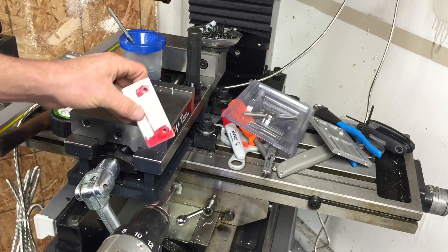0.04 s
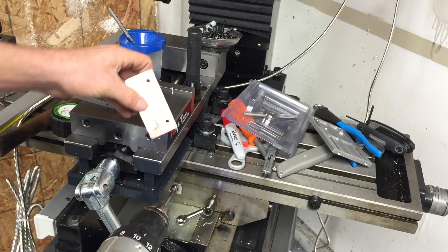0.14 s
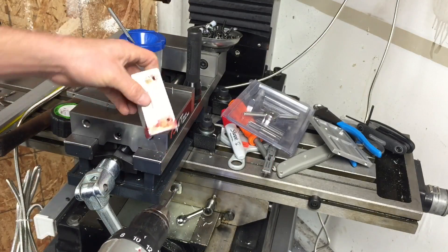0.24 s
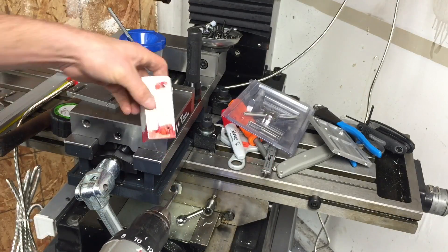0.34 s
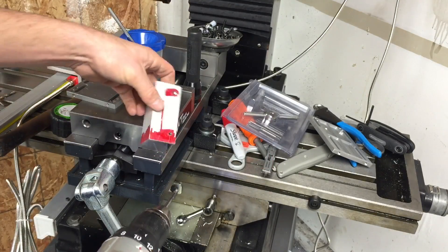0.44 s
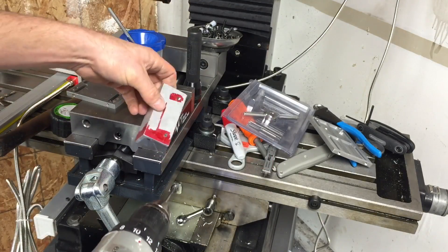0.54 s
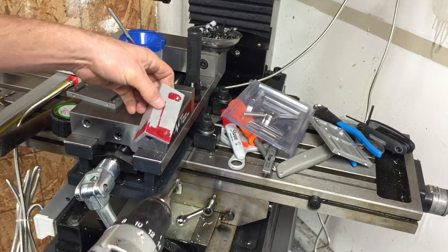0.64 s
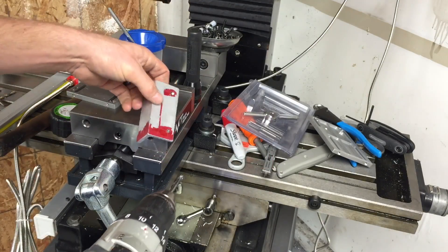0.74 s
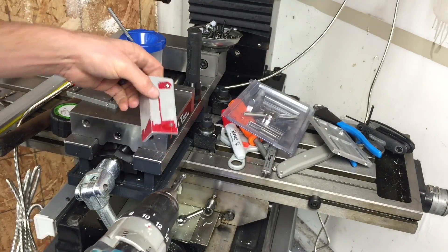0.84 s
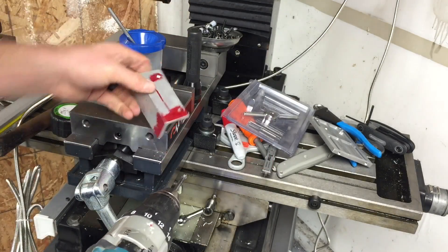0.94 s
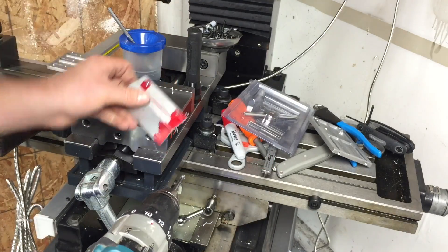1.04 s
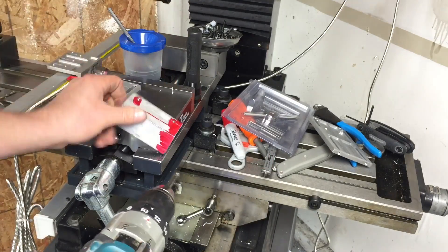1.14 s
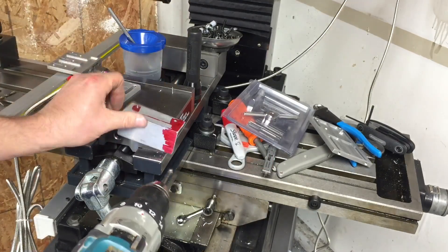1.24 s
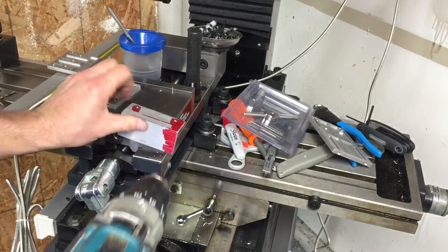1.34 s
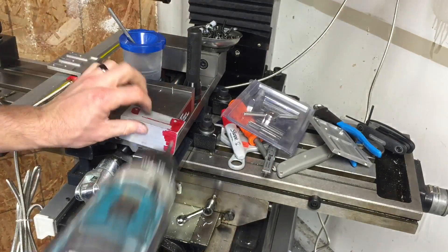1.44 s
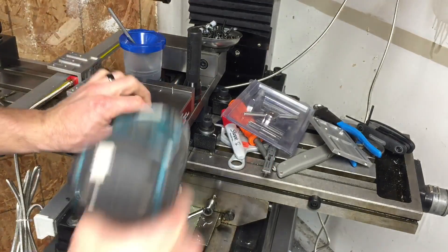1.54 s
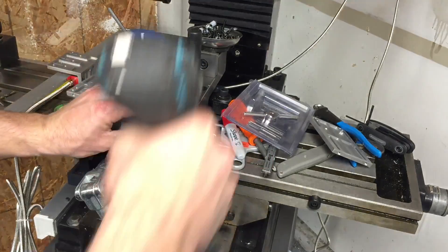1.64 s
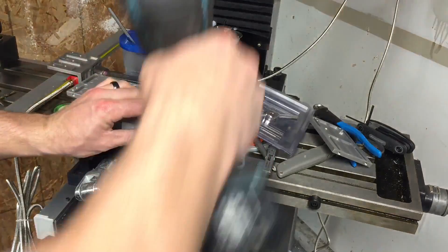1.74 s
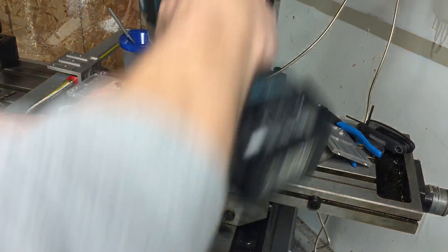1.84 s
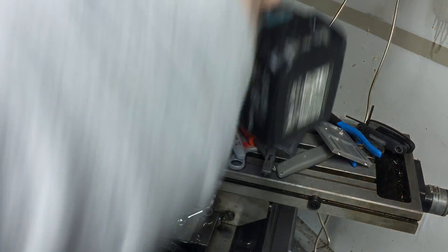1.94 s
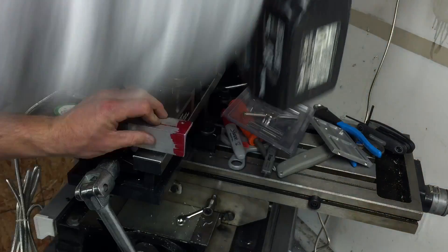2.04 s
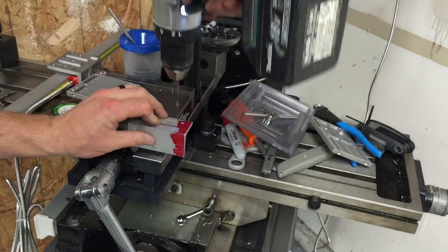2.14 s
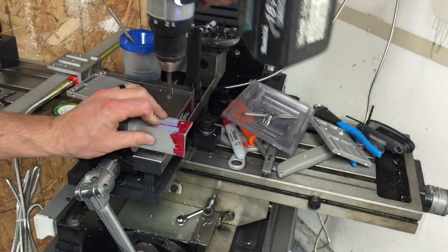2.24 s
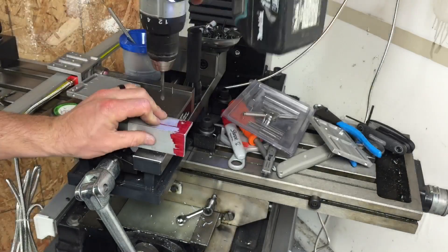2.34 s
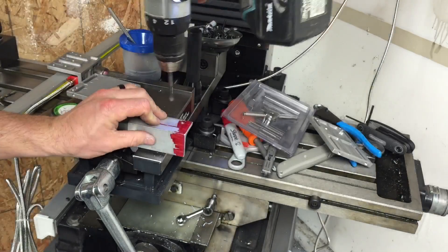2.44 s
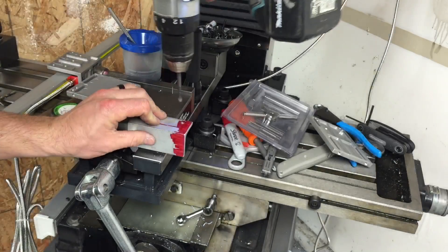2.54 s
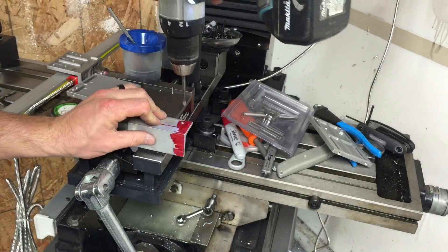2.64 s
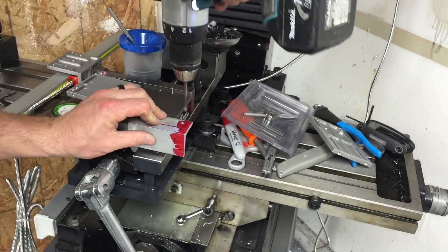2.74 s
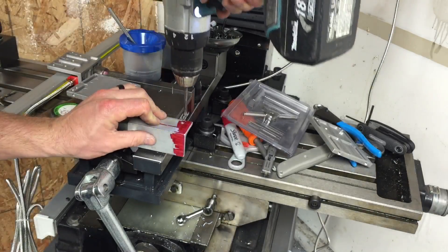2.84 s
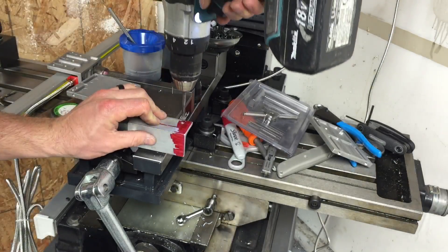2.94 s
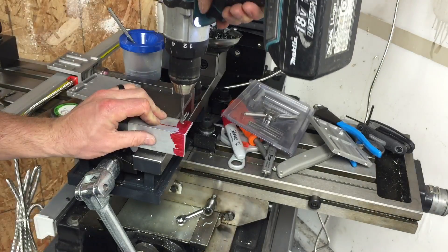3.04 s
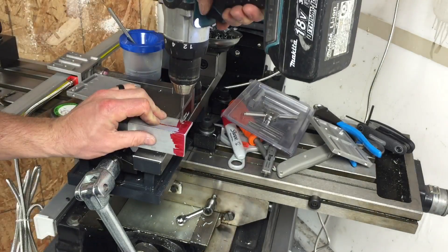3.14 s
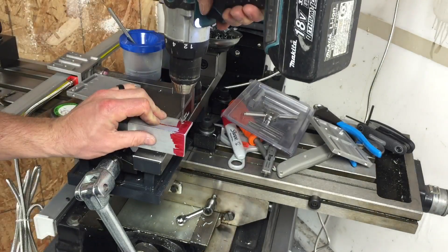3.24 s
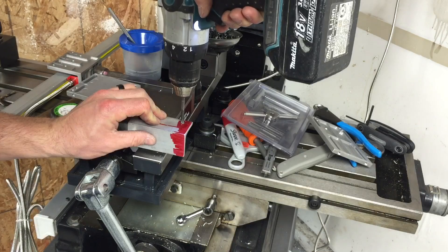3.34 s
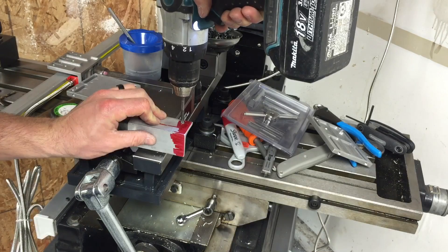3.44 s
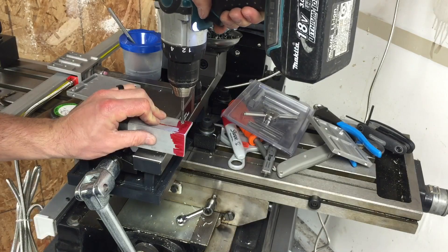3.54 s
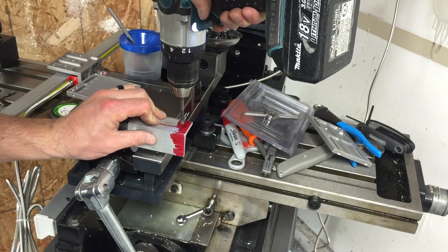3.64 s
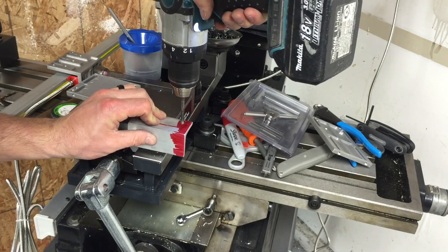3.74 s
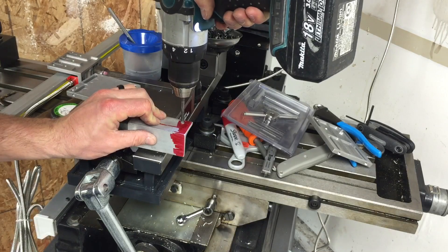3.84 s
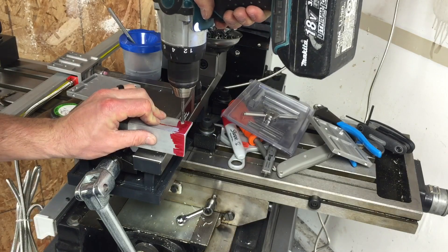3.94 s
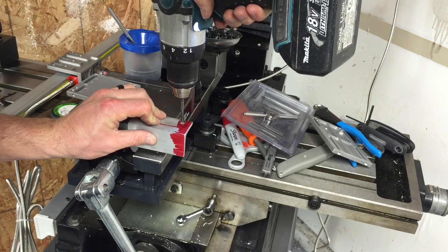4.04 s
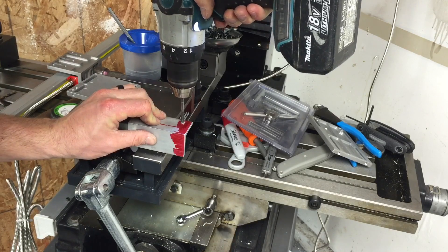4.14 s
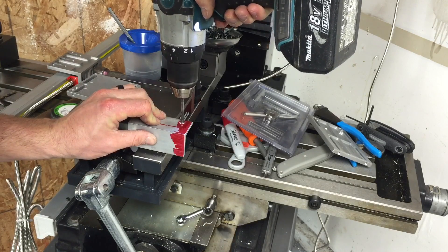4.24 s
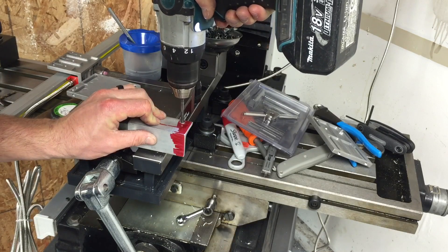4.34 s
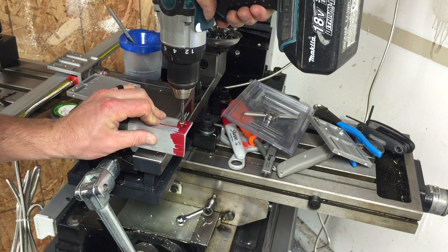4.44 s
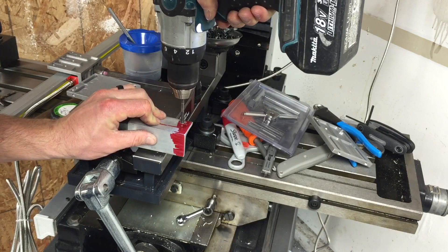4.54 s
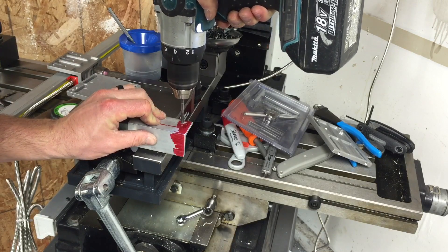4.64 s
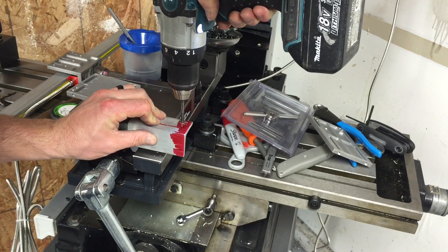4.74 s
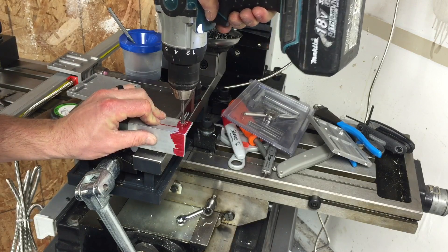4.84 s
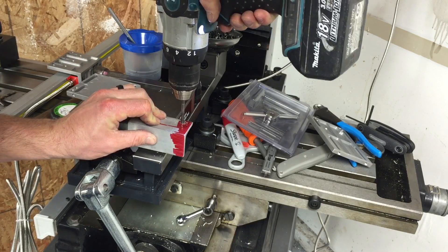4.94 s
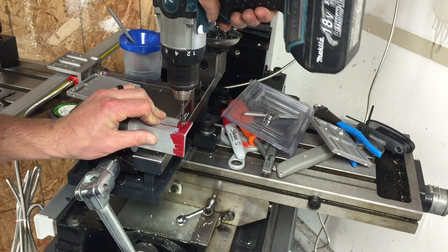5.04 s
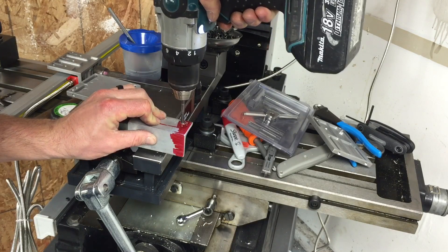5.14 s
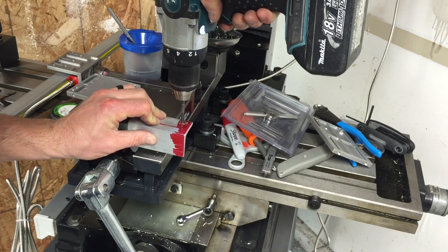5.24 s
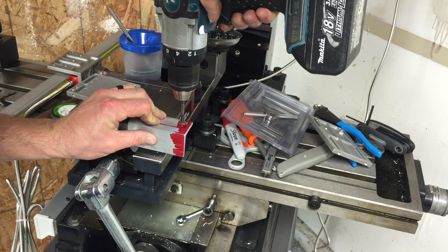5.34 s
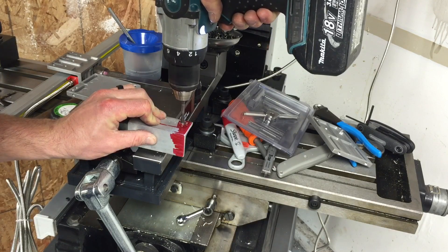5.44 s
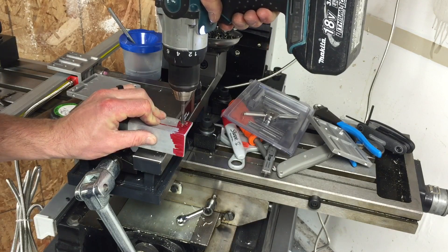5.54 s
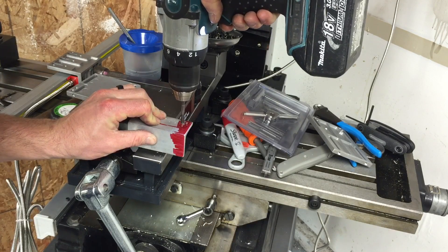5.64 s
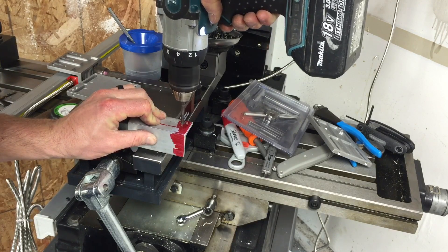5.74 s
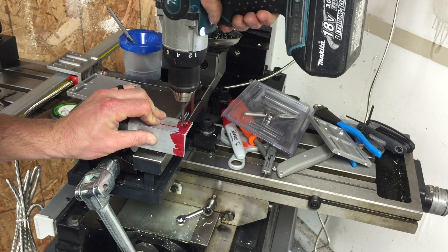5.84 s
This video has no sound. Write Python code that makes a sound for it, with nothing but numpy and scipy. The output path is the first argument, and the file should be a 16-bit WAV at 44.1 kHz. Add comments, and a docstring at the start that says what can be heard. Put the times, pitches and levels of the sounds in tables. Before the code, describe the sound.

Light metal clinks on a solid vice come first, followed by dry clacks as a cordless drill is lifted. Faint bit taps break a near-silent gap. Then two roughly one-second drilling bursts, split by a tiny pause, grind with motor buzz, gear whine, rattle and scraping hiss, each speeding up towards its end. Close microphone, identical in both channels, small hard room, faint machine hum.

```python
"""A small workshop with a faint machine hum: a metal angle bracket is turned over and set down on a steel vice.
Its clinks are ringing tones plus a dead clack from the vice; a cordless drill is picked up with short knocks.
The bit is placed, then bores in two slow bursts on a half-pulled trigger: current pulses make the speed control
buzz, tones tied to the motor's turning make the gears whine, and shaped noise makes the rattle and scrape.
Bench bumps, still air and reflections from close walls surround it."""
import sys
import numpy as np
from scipy import signal
from scipy.fft import rfft, irfft
from scipy.io import wavfile
from scipy.ndimage import uniform_filter1d

SR = 44100
rng = np.random.default_rng(int(sys.argv[2]) if len(sys.argv) > 2 else 0)


def put_to_file(sound):
    """Save the sound as 16-bit audio at rate SR, in the file named by the first command-line argument."""
    columns = np.atleast_2d(sound).T  # one column per channel
    safe = np.clip(columns, -1, 1)
    whole_steps = np.round(safe * 32767)
    wavfile.write(sys.argv[1], SR, whole_steps.astype(np.int16))


N = 260345
T = np.arange(N) / SR  # time of every sample [s]
LABOURING, RACING = 44.6, 69.1  # shaft speed under full load and running nearly free [turns per s]


def amp(db):
    """Turns decibels into a gain."""
    return 10 ** (np.asarray(db) / 20)


def unit(x):
    """Scales a signal to an rms of 1."""
    return x / np.sqrt(np.mean(x ** 2) + 1e-20)


def curve(tables):
    """Joins the points of all bursts by straight lines in time."""
    return np.interp(T, *np.concatenate(tables).T)


def read(points, hz):
    """Reads a table of values over frequency, with pitch spaced logarithmically."""
    f, value = np.transpose(points)
    return np.interp(np.log(hz + 1), np.log(f + 1), value)


def add(mix, s, sound):
    """Mixes a sound in at time s, cutting it at the end of the mix."""
    part = mix[round(s * SR):][:len(sound)]
    part += sound[:len(part)]


def wander(hz):
    """Drifts at random with an rms of 1, up to about hz: random points joined by lines."""
    place = T * 2.5 * hz
    count = int(place[-1]) + 2
    return unit(np.interp(place, np.arange(count), rng.standard_normal(count)))


def body(spectrum, tilt_db=0, size=4096):
    """Gives an object's answer to a tap, energy 1, with its sound packed as early as the spectrum allows."""
    hz = np.fft.rfftfreq(size, 1 / SR)
    level_db = read(spectrum, hz) + tilt_db * np.log2(1 + hz / 1000)
    cepstrum = irfft(np.log(amp(level_db)))
    # folding the second half onto the first makes the answer begin at the tap (minimum phase)
    cepstrum[1:size // 2] *= 2
    cepstrum[size // 2 + 1:] = 0
    response = irfft(np.exp(rfft(cepstrum)))
    return response / np.linalg.norm(response)


def through(x, spectrum):
    """Lets an object colour the sound x that passes through it."""
    return signal.oaconvolve(x, body(spectrum))[:N]


def contact(length, size=6000):
    """Two hard faces meet: tiny collisions swell at once, then fade with the contact length as time constant."""
    u = np.arange(size) / SR / max(length, 1e-4)
    return rng.standard_normal(size) * np.exp(-u) * (1 - np.exp(-(4 * u) ** 2))


# Bursts of drilling: (trigger pulled [s], released [s], time until the bit bites [s],
# gear rattle before later changes [dB], gear whine before later changes [dB])
BURSTS = [(3.756, 4.852, .05, -28.5, -5.5), (4.9944, 5.95, .1, -29.6, -8.5)]


def bursts():
    """Gives the columns of the latest burst begun at each moment (the first burst before it starts)."""
    rows = np.array(BURSTS)
    latest = np.maximum(np.searchsorted(rows[:, 0], T) - 1, 0)
    return rows[latest].T


def running(coast_s):
    """Is 1 while the trigger is pulled, then dies away with the given time constant."""
    on, off, *_ = bursts()
    return (T >= on) * np.exp(-np.maximum(T - off, 0) / coast_s)


# Motor shaft in each burst; it spins up, sags under the load, then races:
# (time [s], speed before smoothing [turns per s])
SHAFT = [
    [(3.757, 10.4), (3.855, 55.3), (3.925, 58.7), (4.07, 45.7), (4.185, 40.7), (4.375, 37.9), (4.48, 65.0),
     (4.57, 71.4), (4.635, 65.3), (4.72, 67.7), (4.82, 64.0), (4.88, 15.6)],
    [(4.995, 8.1), (5.065, 36.5), (5.205, 44.5), (5.465, 39.8), (5.655, 37.1), (5.725, 62.7), (5.82, 64.3),
     (5.9, 74.2)],
]


def drill(inertia_s=.025, whine_racing_db=5.5):
    """Adds buzz, whine, rattle and scrape, which follow the shaft speed and the bite of the bit."""
    # the rotor's mass rounds off changes of speed
    speed = uniform_filter1d(curve(SHAFT), round(inertia_s * SR))
    turns = np.cumsum(speed * (1 + 0.0015 * wander(20))) / SR
    fast = np.clip((speed - LABOURING) / (RACING - LABOURING), 0, 1)  # 0 labouring, 1 racing
    on, _, bite_s, rattle_level, whine_level = bursts()
    skid = 1 - np.clip((T - on) / bite_s, 0, 1) ** 2  # 1 as the bit first skids, 0 once it has bitten
    buzz, phase = chopper(fast)
    # the gears sing out as the motor races
    whine = gears(turns, speed, whine_level + whine_racing_db * fast ** 2)
    scrape = gear_rattle(turns, phase, fast, skid, rattle_level) + cutting(phase, fast, skid)
    return buzz + whine + scrape * running(0.01)


# Buzz of the speed control in each burst: (time [s], rate of current pulses [pulses per s])
PULSE_RATE = [
    [(3.757, 201.6), (3.815, 254.0), (3.89, 202.9), (4.13, 241.0), (4.345, 254.5), (4.405, 264.6),
     (4.535, 237.0), (4.85, 250.9)],
    [(4.995, 193.9), (5.06, 276.2), (5.205, 262.6), (5.635, 246.0), (5.9, 205.6)],
]
# How the housing answers a kick: (frequency [Hz], relative level [dB])
HOUSING = [(100, -12), (250, -3), (450, 6.5), (530, 4), (750, -5.5), (1050, 1), (1300, 2.5), (1400, 4.5),
           (1530, 10.5), (1700, -2.5), (2500, -1), (3200, -3.5), (4200, -18), (6000, -19.5), (16000, -32)]


def chopper(fast, kick_db=-36.5, racing_db=-3.5, jitter=0.0032, uneven=0.023, waver_db=1):
    """Current pulses kick the motor and housing, hardest under load; returns buzz and place in the pulse cycle."""
    hz = curve(PULSE_RATE)
    db = kick_db + racing_db * fast + waver_db * wander(5.5)
    cycles = np.cumsum(hz * (1 + jitter * wander(61.4))) / SR
    # the pulses start afresh at each pull of the trigger
    cycles = cycles - np.interp(bursts()[0], T, cycles) - .15
    samples_per_pulse = SR / hz
    from_pulse = (cycles + .5) % 1 - .5
    pulses = np.sinc(from_pulse * samples_per_pulse) * np.sqrt(samples_per_pulse)
    kicks = pulses * (1 + uneven * wander(80)) * amp(db) * running(0.0014)
    return through(kicks, HOUSING), cycles % 1


# Gear tones: (multiple of the shaft speed, relative level [dB])
GEAR_TONES = [(14, -44), (15, -37.5), (16, -41.5), (22, -48), (31, -32), (45, -46), (46, -43), (49, -40),
              (60, -45), (61, -40), (62, -40.5), (63, -45), (81, -44), (97, -45)]
# How well the gear case radiates a tone: (frequency [Hz], gain [dB])
GEAR_CASE = [(300, -9), (600, -3.5), (850, 1.5), (1050, 1), (1250, -5), (1400, -6), (1550, -2), (1750, -5),
             (1900, -3), (2050, 2), (2300, -2), (2550, -3), (2800, 3), (3100, 1), (3350, -7), (3900, -1),
             (4500, 1), (5300, -5), (6200, -16)]


def gears(turns, speed, whine_db, whine_db_per_octave=1, brighten_db=2, slack=.042, flutter=.33):
    """Tooth-mesh tones and sidebands sweep through the case's resonances; slack between teeth makes them waver."""
    out, octaves = np.zeros(N), np.log2(speed / 67)
    for multiple, db in GEAR_TONES:
        # higher tones grow faster with speed
        growth_db = (whine_db_per_octave + brighten_db * np.log2(multiple / 15)) * octaves
        gain = amp(db + whine_db + growth_db + read(GEAR_CASE, multiple * speed))
        strength = gain * (1 + flutter * wander(30))  # flutter is a share of the strength
        cycles = multiple * turns + slack * wander(30)  # slack is in cycles
        out += strength * np.sin(2 * np.pi * cycles)
    return np.sqrt(2) * out * np.minimum(speed / LABOURING, 1) * running(0.0047)


def grit(phase, surge, grain_db):
    """Makes dense tiny impacts of uneven size that crowd after each kick of the motor."""
    sizes = amp(grain_db * wander(740))
    crowding = 1 + surge * np.cos(2 * np.pi * (phase - .2))
    return unit(rng.standard_normal(N) * sizes * crowding)


def blend(x, fast, slow_spectrum, fast_spectrum):
    """Moves from the labouring to the racing colour as the motor speeds up."""
    return np.sqrt(1 - fast) * through(x, slow_spectrum) + np.sqrt(fast) * through(x, fast_spectrum)


# Colour of the gear rattle, labouring and racing: (frequency [Hz], relative level [dB])
RATTLE_SLOW = [(100, -32.5), (300, -9), (600, -8), (900, -7.5), (1500, 2), (2000, -0.5), (2600, -1),
               (3100, -4.5), (3600, 2.5), (4500, -7), (5500, -6.5), (6500, -36), (9000, -16), (16000, -86)]
RATTLE_FAST = [(100, -90), (300, -7), (600, -2), (1000, 0), (1300, 3), (1600, 6), (2100, 8.5), (2600, 6.5),
               (3200, 0), (4200, 8), (4800, -0.5), (5600, -1), (7000, -36), (16000, -15)]


def gear_rattle(turns, phase, fast, skid, level, trim_db=-6.5, racing_db=4, skid_db=-12.5, repeat=0.53, size=700):
    """Rattles the gear teeth, harder as the motor races and weaker while the bit skids on the metal."""
    # the same tooth flaws come round on every turn, so part of the rattle repeats
    flaws = unit(np.interp(turns % 1, np.arange(size) / size, rng.standard_normal(size)))
    loose = grit(phase, surge=0.059, grain_db=1.5)
    teeth = np.sqrt(repeat) * flaws + np.sqrt(1 - repeat) * loose
    level_db = level + trim_db + racing_db * fast + skid_db * skid
    return amp(level_db) * blend(teeth, fast, RATTLE_SLOW, RATTLE_FAST)


# Cutting hiss in each burst, before the trim and the skid: (time [s], level [dB])
HISS = [
    [(3.82, -38.5), (3.894, -34), (4.024, -40), (4.174, -35.5), (4.83, -36.5)],
    [(5.1, -40), (5.262, -36), (5.592, -44), (5.624, -36), (5.89, -34)],
]
# Colour of the cutting hiss, labouring and racing: (frequency [Hz], relative level [dB])
CUT_SLOW = [(3000, -8), (5500, 6), (6700, 5), (7400, 11.5), (8000, 0.5), (10000, 3.5), (10800, 7.5),
            (11400, 8), (12100, -7), (13500, -1.5), (16000, -17.5)]
CUT_FAST = [(3000, -36), (5500, 5.5), (6500, 1), (7400, 4.5), (8200, 1.5), (9800, -6.5), (11100, 2.5),
            (12200, -4.5), (13500, -4), (16000, -4.5)]


def cutting(phase, fast, skid, trim_db=-1.0, skid_db=-32):
    """Scrapes the bit through metal with uneven tiny impacts, nearly absent while the bit first skids."""
    chips = grit(phase, surge=0.049, grain_db=1.5) * amp(1.06 * wander(40))
    level_db = curve(HISS) + trim_db + skid_db * skid
    return amp(level_db) * blend(chips, fast, CUT_SLOW, CUT_FAST)


# Bracket on the vice: (time [s], level [dB], edge contact [0 flat to 1 edge], ring [factor on t60],
# clack against the level [dB], brightness [dB per octave], contact length [s])
CLINKS = [(0.483, -17.5, 0.11, 0.54, -1, -4.5, 0.00049), (0.487, -31.5, .2, 0.57, 2, 0, 0.0079),
          (1.1838, -18, 0.7, 1.1, -4, -4, 0.00027), (1.191, -12, 1, 0.83, -4.5, 0.5, 0.0026),
          (1.202, -20, 1, 0.56, 0.5, 0.5, 0.0046), (1.218, -33.5, 0.3, 0.54, 8, -2.5, 0.0077),
          (1.3, -9, 0.93, 0.15, -6, 6, 0.0031), (1.453, -46.5, 0.6, 1.5, -1.5, 5.5, 0.03),
          (1.476, -53, 0.6, 0.41, 9, -6.5, 0.018), (1.574, -34.5, 0.6, 0.52, -0.5, 8, 0.031),
          (1.596, -39, 0.3, 0.41, 6, -9, 0.011), (1.61, -20, 0.13, 0.28, 0, 9.5, 0.00067),
          (1.6135, -35, 0, 0.75, 4, -3.5, 0.0036), (1.658, -42.5, 0.04, 0.78, 4.5, 0, 0.015)]
# Ringing tones of the bracket: (frequency [Hz], relative level struck on the flat [dB],
# relative level struck on the edge [dB], t60 before the ring factor and contact length [s])
BRACKET = [(1649, -19.5, -11.5, 0.068), (1790, -22, -25, 0.1), (2270, -7.5, -16, 0.052),
           (2485, -15.5, -15, 0.09), (3229, 0, -20, 0.075), (3288, 5.5, -20.5, 0.14), (3280, -8, -24, .12),
           (4635, -17.5, -7, 0.043), (4655, -10.5, 2.5, 0.096), (4760, -9.5, -12, .09),
           (6080, -14, -3.5, .08), (6180, -15, -14.5, 0.07), (6440, -11, -7, 0.15), (6600, -18, -14, 0.18),
           (7730, -29.5, -15.5, 0.085), (7960, -22.5, -5, .11), (8400, -28.5, -19, .05),
           (12130, -21.5, -22, 0.15), (13200, -19.5, -22, 0.15), (13620, -24, -28.5, 0.11),
           (14690, -33, -28, 0.073)]
# The vice's dead answer: (frequency [Hz], relative level [dB])
VICE = [(60, -38), (180, -25.5), (330, -10.5), (700, -6.5), (1100, -1.5), (1800, 4), (2500, -0.5),
        (4000, -5), (6500, -6.5), (9000, -14.5), (11000, -27.5), (16000, -36.5)]


def clinks(clack_s=0.0031, seated=0.5, settle_s=0.012):
    """Rings the bracket by where it lands; it loses half its swing as it seats, and the vice clacks."""
    out, t = np.zeros(N), np.arange(SR // 3) / SR
    hz, flat_db, edge_db, t60 = np.transpose(BRACKET)[:, :, None]
    settling = seated + (1 - seated) * np.exp(-t / settle_s)
    for s, db, edge, ring, clack_db, tilt_db, length in CLINKS:
        weight = amp(flat_db + edge * (edge_db - flat_db) + tilt_db * np.log2(hz / 5000))
        swing = np.sin(2 * np.pi * (hz * t + rng.random(hz.shape)))
        decay = amp(-60 * t / (t60 * ring + 4 * length))
        onset = 1 - np.exp(-3 * t / length)
        modes = (weight * decay * swing).sum(0) * onset
        add(out, s, amp(db) * modes * settling)
        clack = signal.fftconvolve(contact(length + clack_s), body(VICE, tilt_db))
        add(out, s, amp(db + clack_db) * clack)
    return out


# Clacks of the drill as it is lifted, gripped and its trigger taken up:
# (time [s], level [dB], brightness [dB per octave], contact length [s])
HANDLING = [(1.7410, -39, -9, 0.00087), (1.8033, -28, 2.5, 0.002), (1.8068, -14.5, 3, 0.001),
            (1.8140, -38, -12, 0.0039), (1.8716, -19, 4.5, 0.0027), (1.875, -23, 1, 0.0012),
            (2.0255, -44.5, -9.5, 0.0045), (3.74, -40.5, 0, 0.0027), (4.967, -42, 4.5, 0.0022)]
# Colour of the drill's clacks: (frequency [Hz], relative level [dB])
DRILL_BODY = [(80, -28), (300, -21.5), (800, -8.5), (1200, 1.5), (1600, 5), (2000, -5), (2500, 0),
              (3600, -7.5), (4800, -7), (6200, -7), (9500, -13.5), (16000, -25.5)]
# The bit is set on the held bracket: (time [s], level [dB], brightness [dB per octave], contact length [s])
BIT_TAPS = [(3.1705, -34.5, -1.5, 0.0043), (3.3855, -42, 6, 0.0016), (3.4160, -41.5, -0.5, 0.0095),
            (3.4305, -31.5, -0.5, 0.0029)]
# Colour of the bit's taps: (frequency [Hz], relative level [dB])
BIT_BODY = [(80, -22.5), (300, -27), (900, -6), (1350, 4.5), (1750, -6), (2600, -11.5), (3300, -3),
            (3850, 1), (4700, -21), (6600, -13), (9500, -31), (16000, -43)]


def knocks(rows, spectrum):
    """Knocks on a body with short bursts of collisions, giving dead sounds without a long ring."""
    out = np.zeros(N)
    for s, db, tilt_db, length in rows:
        knock = signal.fftconvolve(contact(length), body(spectrum, tilt_db))
        add(out, s, amp(db) * knock)
    return out


# Dull bumps as the drill presses and the bit snags: (time [s], level [dB], time to the peak [s])
BUMPS = [(3.174, -59, 0.014), (3.432, -57, 0.0093), (3.476, -59, 0.0083), (3.518, -60, 0.009),
         (4.525, -42.5, 0.033), (4.645, -41.5, 0.035)]
# Colour of the shaking bench: (frequency [Hz], relative level [dB])
BENCH = [(40, -28), (65, -10), (90, -1.5), (130, -2.5), (200, -6), (350, -3.5), (600, -2), (1500, -87)]


def shudder(tremble_db=-64):
    """Shakes the bench steadily while the drill runs; each bump swells and dies away."""
    level = amp(tremble_db) * running(0.034)
    for s, db, rise_s in BUMPS:
        u = np.maximum(T - s, 0) / rise_s
        level = level + amp(db) * u * np.exp(1 - u)
    return level * through(rng.standard_normal(N), BENCH)


# Colour of the still air: (frequency [Hz], relative level [dB per Hz])
AIR = [(25, -15.5), (45, -12.5), (65, 0.5), (90, -14.5), (120, -10), (170, -11.5), (300, -14), (550, -14),
       (800, -11), (1000, -13.5), (1400, -22.5), (3000, -24.5), (8000, -31), (16000, -37.5)]
# Tones of the machine hum: (frequency [Hz], rms level before wavering [dB])
HUM = [(61, -72), (120, -74), (600, -78), (720, -74), (750, -71.5)]


def workshop(air_db=-65.5, waver=0.34):
    """Mixes still air, as shaped noise, with the wavering tones of a humming machine."""
    hum = np.zeros(N)
    for hz, db in HUM:
        strength = amp(db) * (1 + waver * wander(3.9))
        hum += strength * np.sin(2 * np.pi * (hz * T + 0.065 * wander(2)))
    air = amp(air_db) * through(rng.standard_normal(N), AIR)
    return air + np.sqrt(2) * hum


# How long the room's reflections last: (frequency [Hz], t60 [s])
ROOM = [(100, 0.33), (500, 0.26), (1500, 0.28), (4000, 0.29), (8000, 0.25), (16000, 0.2)]


def room(x, gap_s=0.0048):
    """Adds dense reflections from close walls, each band dying at its own speed."""
    size = SR // 2
    taps = rng.standard_normal(size) * (rng.random(size) < .15)
    taps *= np.arange(size) > gap_s * SR  # silence before the first reflection
    hz, t, z = signal.stft(taps, SR, nperseg=256)
    decay = amp(-60 * t / read(ROOM, hz)[:, None])
    tail = signal.istft(z * decay, SR, nperseg=256)[1]
    return signal.oaconvolve(x, tail / np.linalg.norm(tail))[:N]


def scene(drill_wet_db=-9, clink_wet_db=-12, knock_wet_db=-6, tap_wet_db=-11):
    """Mixes all sources and reflections, alike in both channels; the wet levels feed the room."""
    boring, metal = drill(), clinks()
    handling, taps = knocks(HANDLING, DRILL_BODY), knocks(BIT_TAPS, BIT_BODY)
    to_room = amp(drill_wet_db) * boring + amp(clink_wet_db) * metal
    to_room += amp(knock_wet_db) * handling + amp(tap_wet_db) * taps
    mono = boring + metal + handling + taps + room(to_room) + shudder() + workshop()
    return np.array([mono, mono])


def record(dry):
    """Removes the highest treble with a steep low-pass at 15900 Hz, without shifting the sound in time."""
    low_pass = signal.firwin(511, 15900, window=("kaiser", 9), fs=SR)
    return signal.oaconvolve(dry, low_pass[None], "same")


dry = scene()
out = record(dry)
put_to_file(out)
```